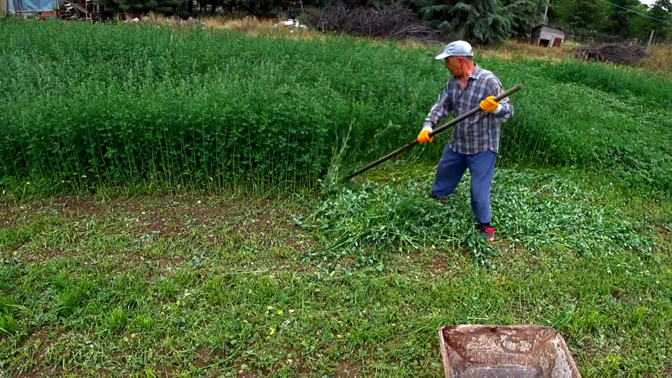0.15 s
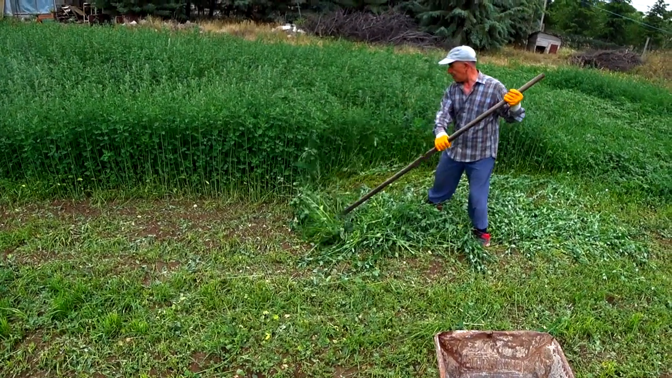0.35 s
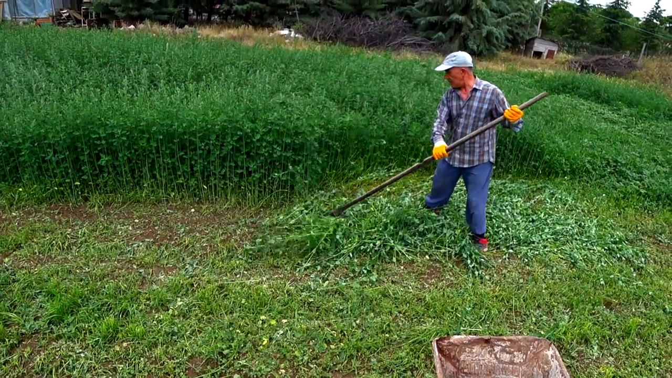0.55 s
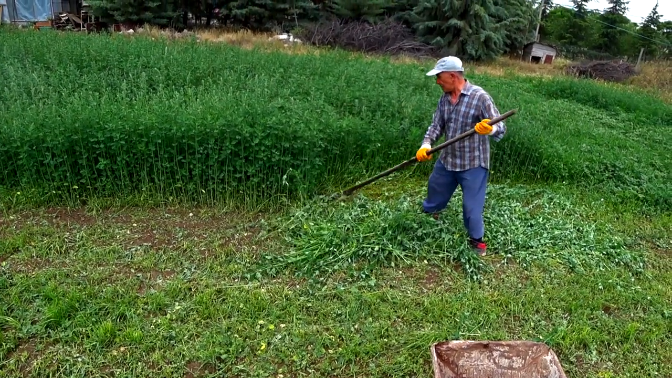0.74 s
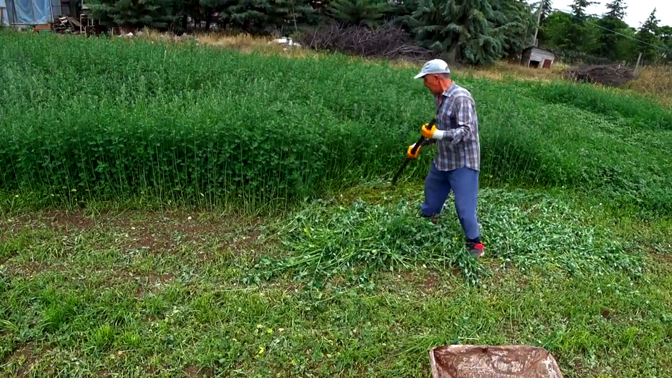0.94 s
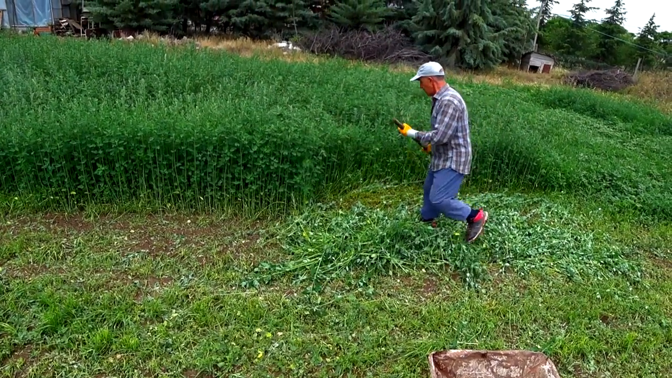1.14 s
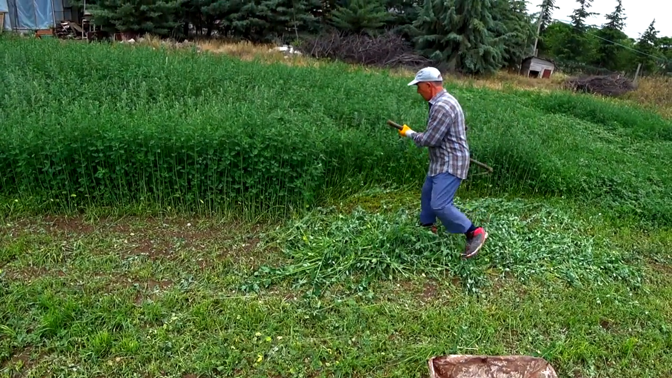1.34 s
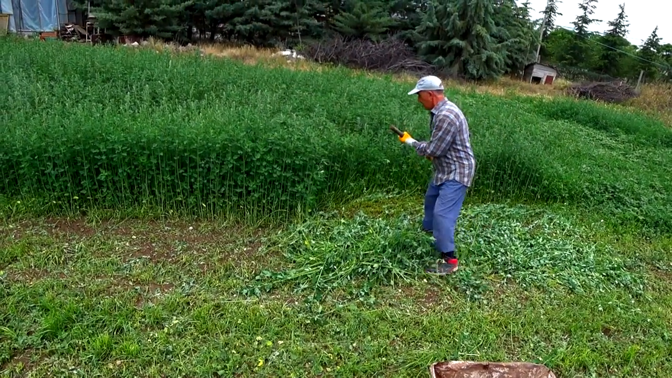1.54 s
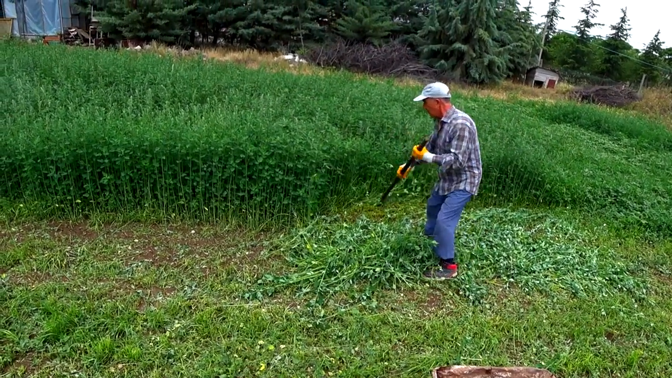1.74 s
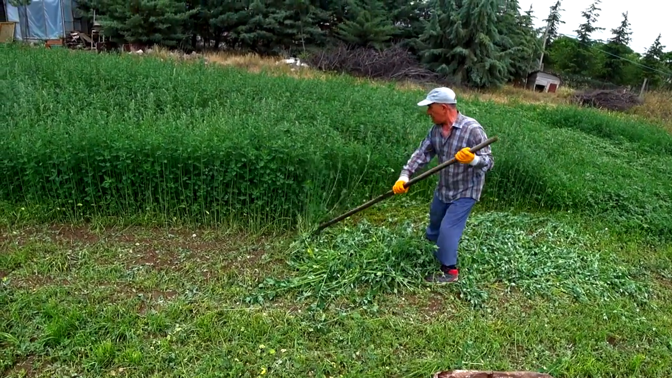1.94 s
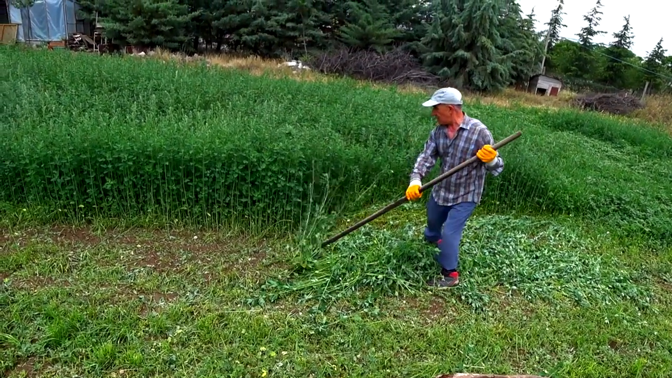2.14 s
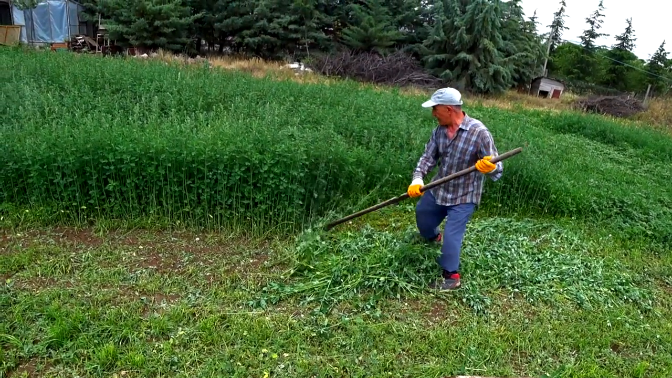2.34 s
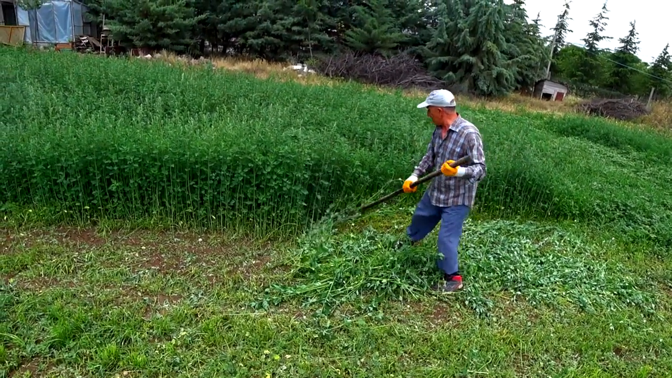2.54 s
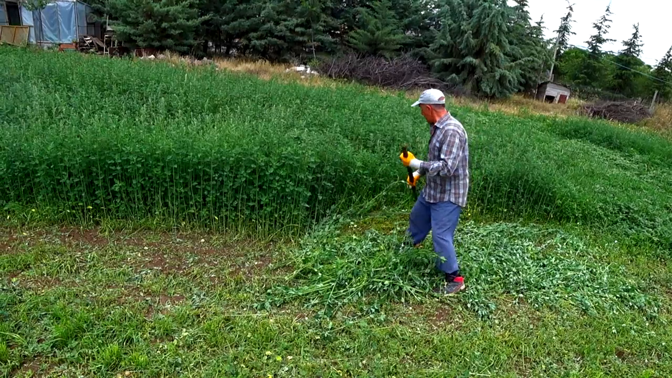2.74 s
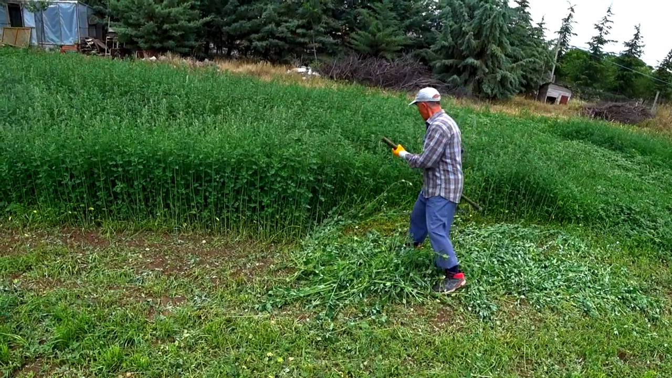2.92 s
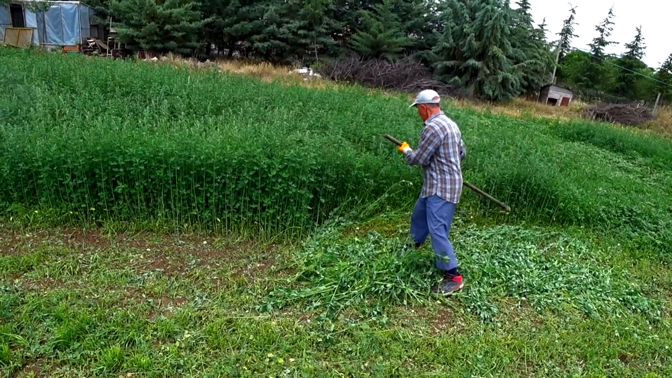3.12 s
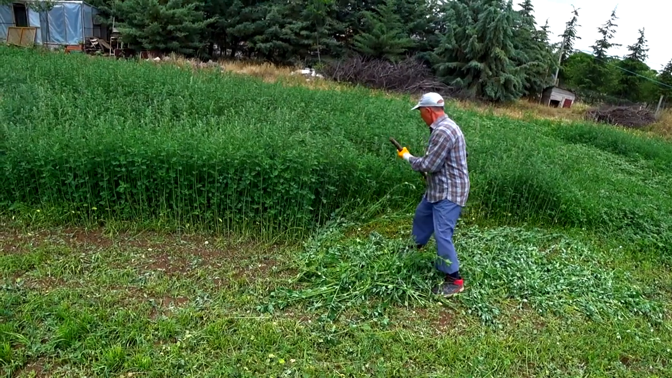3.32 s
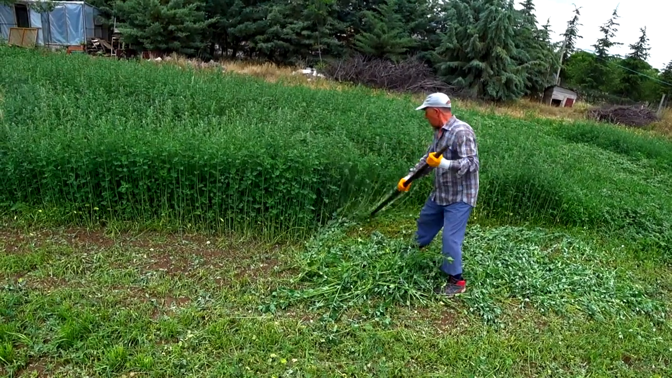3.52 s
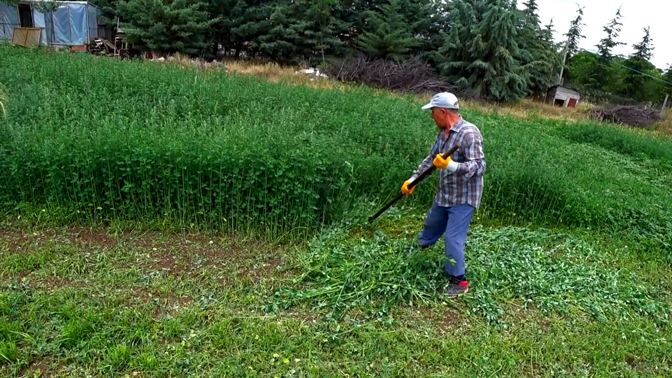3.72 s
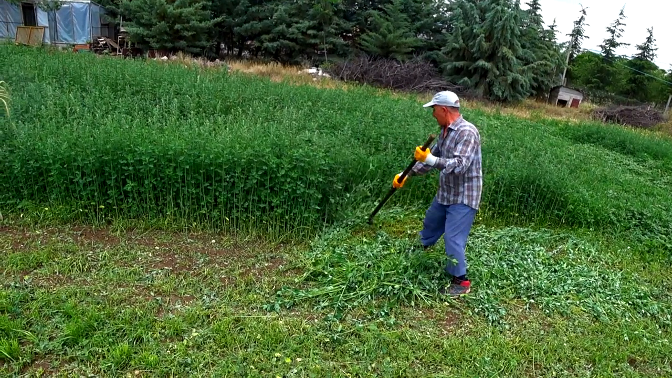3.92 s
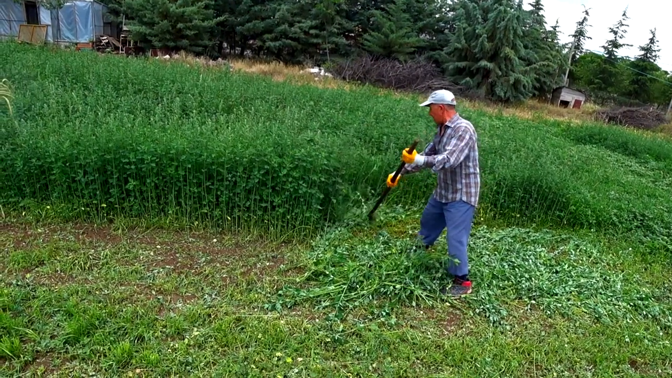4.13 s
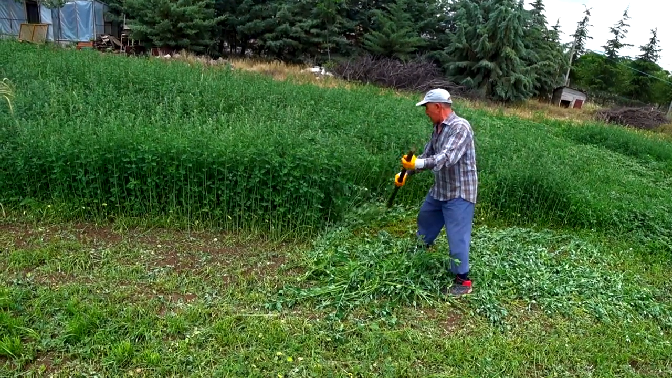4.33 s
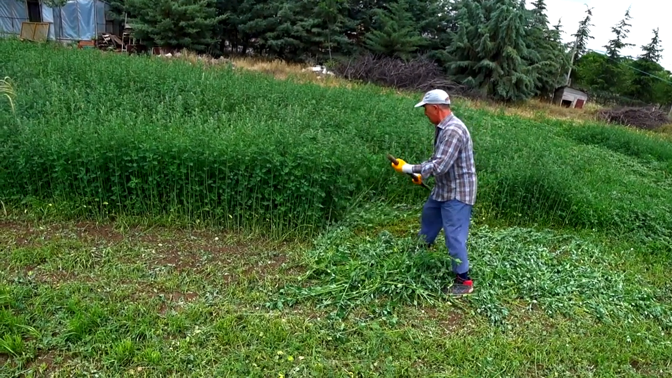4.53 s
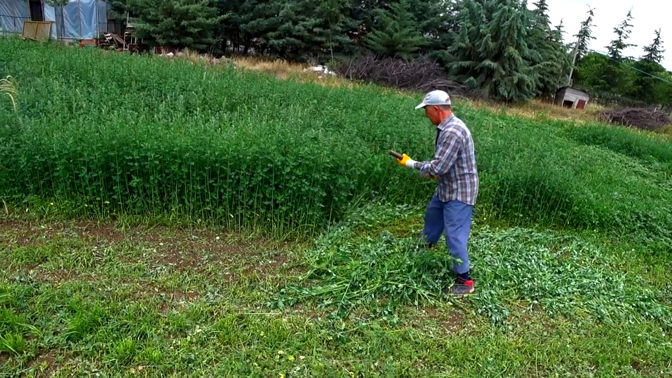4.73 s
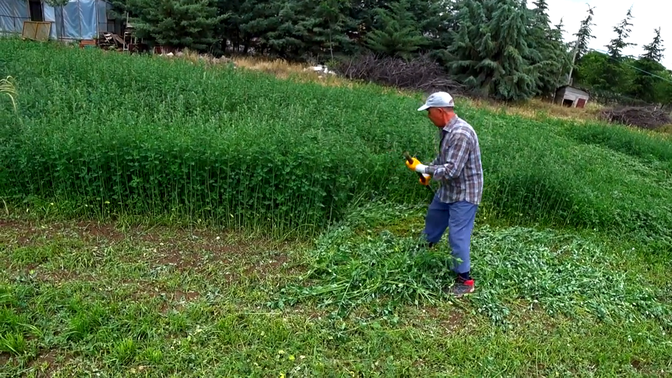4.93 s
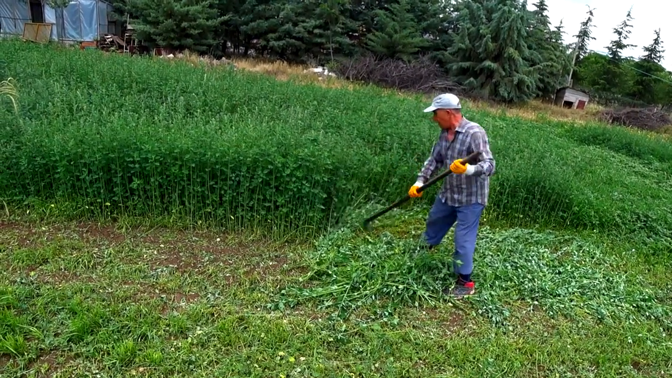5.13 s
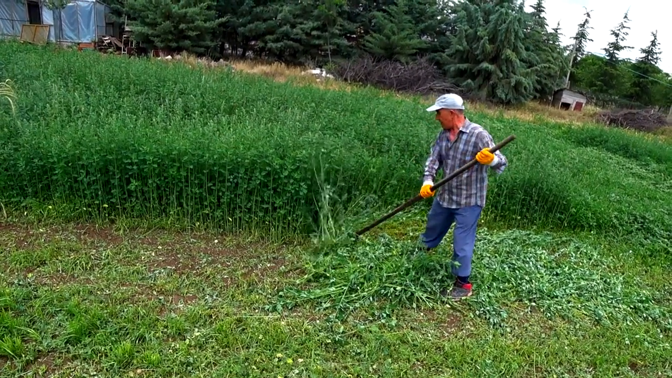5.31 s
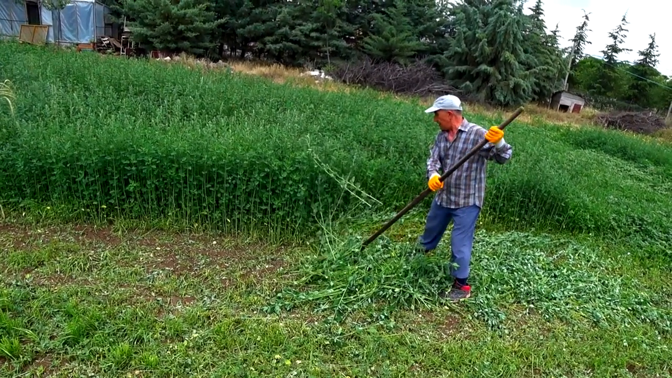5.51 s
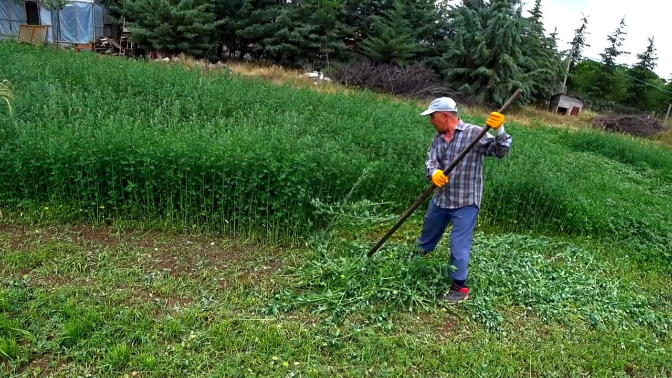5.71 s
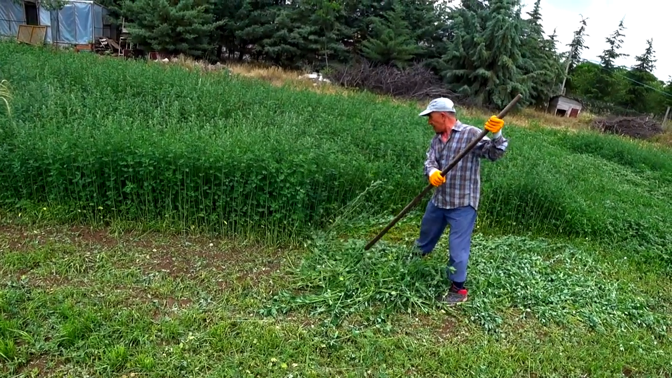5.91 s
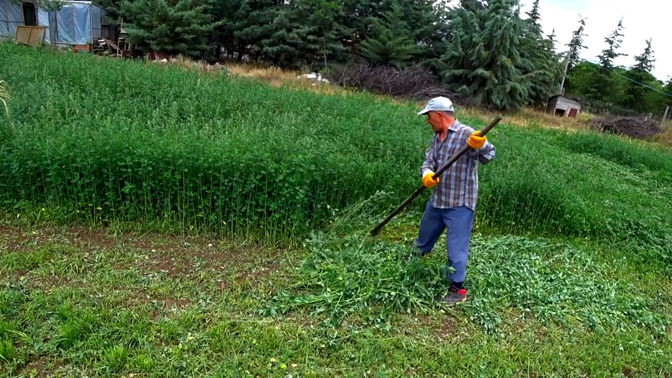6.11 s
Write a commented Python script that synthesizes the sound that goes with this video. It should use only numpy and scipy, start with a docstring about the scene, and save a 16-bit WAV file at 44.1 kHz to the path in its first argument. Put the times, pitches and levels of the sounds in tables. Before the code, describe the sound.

A hand scythe slices tall fresh grass in four separate crisp strokes, dragging softly over stubble between them, with faint far birds and low wind.

```python
"""In an open field a scythe mows tall fresh grass in four strokes, and is dragged back over stubble between them.
Dense random impulses, spectrally shaped, are the severed stems; they also excite the damped modes of the blade,
with plucked tones of scattered pitch that rise clearly only in the second stroke. Stalks snap; the swath rustles.
Gliding and warbling sines are small far birds; shaped noise is the low rumble and puffs of wind at the
microphone; there is one dull thud of decaying low modes."""
import sys
import numpy as np
from scipy import signal
from scipy.fft import rfft, irfft, next_fast_len
from scipy.io import wavfile
from scipy.ndimage import map_coordinates

SR = 44100
rng = np.random.default_rng(int(sys.argv[2]) if len(sys.argv) > 2 else 0)


def file_out(sig):
    """Save sig as 16-bit WAV at sys.argv[1]."""
    # one column per channel
    cols = np.atleast_2d(sig).T
    # limit, then scale
    lim = np.clip(cols, -1, 1)
    pcm = np.round(lim * 32767).astype(np.int16)
    wavfile.write(sys.argv[1], SR, pcm)


N = 271741
T = np.arange(N) / SR  # time in seconds


def amp(db):
    """Level law: decibels to amplitude gain."""
    return 10 ** (np.asarray(db) / 20)


def unit(x):
    """Normalisation: scale to rms 1."""
    return x / np.sqrt(np.mean(x ** 2) + 1e-20)


def along(points, hz):
    """Interpolation of (hz, value) points on a logarithmic frequency axis."""
    f, v = np.transpose(points)
    return np.interp(np.log(hz + 1), np.log(f + 1), v)


def wobble(rate):
    """Slow random modulation: a smooth curve through random knots, rate of them a second."""
    knots = rng.standard_normal(int(N * rate / SR) + 4)
    return map_coordinates(knots, [T * rate])


def filtered(x, response):
    """Linear filtering: the spectrum of x times a complex response of frequency."""
    size = next_fast_len(N + SR // 2)
    hz = np.fft.rfftfreq(size, 1 / SR)
    return irfft(rfft(x, size) * response(hz), size)[..., :N]


def coloured(x, spectrum):
    """Spectral shaping: x weighted by (hz, db) points, at rms 1."""
    return unit(filtered(x, lambda hz: amp(along(spectrum, hz))))


def rung(x, modes):
    """Modal resonance: x through a sum of damped resonators of alternating sign, at rms 1."""
    def response(hz):
        total = 0
        for k, (centre, width, db) in enumerate(modes):
            damping = 1j * hz * width
            total = total + (-1) ** k * amp(db) * damping / (centre * centre - hz * hz + damping)
        return total
    return unit(filtered(x, response))


def crackle(rate, spread_db, clump_db):
    """Shot noise: tiny fractures at random moments, rate a second, of random size and in clumps, at rms 1."""
    hits = rng.random(N) < rate / SR
    clumps = wobble(260) + wobble(55)
    size_db = spread_db * rng.standard_normal(N) + clump_db * clumps
    return unit(hits * rng.standard_normal(N) * amp(size_db))


def swells(rows):
    """Amplitude envelope: Gaussian bells from (centre_s, length_s, level_db) rows, the length being one sigma."""
    return sum(amp(db) * np.exp(-.5 * ((T - s) / length) ** 2) for s, length, db in rows)


def gesture(s, hold, rise_s, fade_s):
    """Exponential envelope: it rises, holds from s on, and fades; rise and fade are seconds per 20 dB."""
    before = np.maximum(s - T, 0) / max(rise_s, .005)
    after = np.maximum(T - s - hold, 0) / max(fade_s, .005)
    return amp(-20 * (before + after))


# cutting strokes: full_swing_s, hold_s, run_in_s (per 20 dB),
# pitch_rise_from_s (a time after the stroke's end means no rise),
# then relative levels: tearing_db, plucked_ring_db, broad_ring_db
STROKES = [(0.005, 0.13, 0.03, 0.13, -39.5, -50.5, -56), (1.878, 0.14, 0.19, 1.94, -37, -43.5, -51),
           (3.503, 0.0955, 0.07, 3.9, -39.5, -50, -52.5), (5.195, 0.036, 0.15, 6, -37, -45.5, -51)]
RUN_OUT_S = 0.21  # per 20 dB of fade at steepness 1, once the blade leaves the stand
RING_STEEPNESS = 1.72  # the ring comes and goes more steeply than the tearing


def swings(levels_db, steepness, grows_db):
    """Loading of the edge: gain over all strokes, one level each, changing by grows_db during the stroke."""
    gain = np.zeros(N)
    for (s, length, run_in, *_), db in zip(STROKES, levels_db):
        progress = np.clip((T - s) / length, 0, 1)
        envelope = gesture(s, length, run_in, RUN_OUT_S) ** steepness
        gain += envelope * amp(db + grows_db * (progress - .5))
    return gain


def pluck(s, hz, db, t60):
    """Damped free vibration: one short ring of the blade, soon stopped by the grass; t60 in seconds."""
    out = np.zeros(N)
    start = int(np.clip(round(s * SR), 0, N - 1))
    t = T[:min(SR // 20, N - start)]
    envelope = amp(db - 60 * t / t60) * (1 - np.exp(-t / 0.00033))
    out[start:start + len(t)] = envelope * np.sin(2 * np.pi * hz * t)
    return out


# outdoor rumble, spectrum: frequency_hz, relative_density_db
RUMBLE_SPECTRUM = [(13, -42), (22, -0.5), (59, 2), (109, -12.5), (143, -10), (248, -7.5), (400, -19),
                   (1190, -24.5), (2180, -29), (5110, -31), (6030, -35), (9110, -36), (11000, -32.5),
                   (15800, -36.5)]
# stereo spread of the rumble: frequency_hz, side_minus_mid_db
RUMBLE_WIDTH = [(60, -43), (110, -6), (200, -16.5), (380, 0), (700, 3.5), (1290, 5), (2380, 3.5),
                (8000, -3)]
# far hum: frequency_hz, mean_level_db
HUM = [(49.5, -61), (100, -60.5)]
# puffs of wind on the microphone: centre_s, length_s, level_db
PUFFS = [(0.36, 0.021, -41.5), (0.53, 0.016, -47.5), (0.666, 0.031, -38.5), (1.112, 0.015, -33.5)]
# a puff, spectrum: frequency_hz, relative_density_db
PUFF_SPECTRUM = [(15, -19), (42, 3), (70, -13), (130, -16), (300, -35), (1000, -100)]


def air(floor_db=-52.0):
    """Broadband turbulence: a low diffuse rumble with a faint hum, and puffs of wind on the microphone."""
    def mid_and_side(hz):
        mid_db = along(RUMBLE_SPECTRUM, hz)
        return amp([mid_db, mid_db + along(RUMBLE_WIDTH, hz)])
    mid, side = filtered(rng.standard_normal((2, N)), mid_and_side)
    rumble = amp(floor_db + 1.17 * wobble(6.4)) * unit(np.array([mid + side, mid - side]))
    hum = np.zeros(N)
    for hz, db in HUM:
        hum += amp(db + 5.0 * wobble(3.6)) * np.sin(2 * np.pi * hz * T + 2.0 * wobble(5.0))
    eddies = rng.standard_normal(N) + 0.51 * rng.standard_normal((2, N))  # partly different in each channel
    return rumble + hum + swells(PUFFS) * coloured(eddies, PUFF_SPECTRUM)


# tearing stems, spectrum: frequency_hz, relative_density_db
STEM_SPECTRUM = [(1470, -33), (2500, -4), (2740, -14), (3560, -4), (5890, 0.5), (6410, 0.5), (7530, 6),
                 (9140, 0.5), (10300, 5), (15800, -6.5)]
# brushing leaves, spectrum: frequency_hz, relative_density_db
LEAF_SPECTRUM = [(150, -54), (300, -2.5), (550, -8), (900, -4), (1400, -6.5), (2500, -1.5), (3600, -2.5),
                 (5500, 1), (6500, -2), (7500, 2.5), (8800, -2.5), (10500, 1.5), (12500, -5), (15800, -10)]
# upper blade modes, damped by the grass: frequency_hz, width_hz, relative_level_db
HIGH_MODES = [(1470, 1020, 0.5), (1704, 200, 7), (2420, 280, 3), (3300, 210, 2), (3880, 120, 3.5)]


def grass(loose, rest_db=-71, tear_grows_db=-0.5):
    """Friction and fracture: leaves brush softly and never quite rest; at full swing crisp tearing takes over."""
    *_, tear_db, _, _ = np.transpose(STROKES)
    stir = np.sqrt(swings(tear_db, 1, tear_grows_db) ** 2 + loose ** 2 + amp(rest_db) ** 2)
    level_db = 20 * np.log10(stir)
    cutting = 1 / (1.5 + np.exp((-49.0 - level_db) / 3))
    brush = coloured(crackle(rate=7000, spread_db=-0.5, clump_db=1.1), LEAF_SPECTRUM)
    tear = coloured(crackle(rate=10000, spread_db=0.9, clump_db=1.14), STEM_SPECTRUM)
    stubble = rung(crackle(rate=110, spread_db=1.5, clump_db=1), HIGH_MODES)  # stray stalks tick on the blade
    soft = amp(3.0) * brush + amp(-18.0) * stubble
    return stir * (np.sqrt(1 - cutting) * soft + amp(2.0) * np.sqrt(cutting) * tear)


# lower blade modes, damped by the grass: frequency_hz, width_hz, relative_level_db
LOW_MODES = [(404, 130, -2), (685, 170, -2.5), (980, 108, 0.5), (1390, 230, -4.5)]
RING_GROWS_DB = 2.5  # from start to end of a stroke


def blade(scrape, low_db=2.5, scrape_low_db=-2):
    """Forced modal vibration: fine stems drum on the blade; stubble rubs it with a denser, smoother grain."""
    *_, broad_db = np.transpose(STROKES)
    broad = swings(broad_db, RING_STEEPNESS, RING_GROWS_DB)
    low = amp(low_db) * broad * rung(crackle(rate=810, spread_db=1.5, clump_db=2.0), LOW_MODES)
    high = broad * rung(crackle(rate=450, spread_db=-1.7, clump_db=0.5), HIGH_MODES)
    rub = crackle(rate=2200, spread_db=0.5, clump_db=1.0)
    rubbing = scrape * (amp(scrape_low_db) * rung(rub, LOW_MODES) + rung(rub, HIGH_MODES))
    # the ring is hollow around 550 Hz
    hollow = [(440, 0.5), (550, -21), (660, -0.5)]
    return filtered(low + high + rubbing, lambda hz: amp(along(hollow, hz)))


# a snapping or ticking stalk, spectrum: frequency_hz, relative_density_db
CRACK_SPECTRUM = [(300, -3), (1500, -17), (3500, -8.5), (6000, 2), (7600, 7.5), (9000, 2.5), (10500, 6.5),
                  (15800, -2.5)]
# centre of the plucked pitch before any rise, speed of a rise in octaves per second, its limit in octaves
PLUCK_HZ, RISE_OCT_PER_S, RISE_LIMIT_OCT = 896, 19, 1.35


def stalks(rate=115, uneven=0.27, size_db=3, detune_oct=0.16, t60=0.019,
           overtone=2.36, overtone_db=-5, tick_db=-4, tick_s=0.0011):
    """Successive plucking: stouter stems tick and ring the blade at scattered pitches, rising clearly in stroke two."""
    rings, ticks = np.zeros((2, N))
    t = T[:SR // 100]
    stems_per_stroke = 60
    for s, length, run_in, rise_from, *_ in STROKES:
        draws = rng.standard_normal((stems_per_stroke, 4))
        for k, (late, size, detune, upper) in enumerate(draws):
            at = s - run_in + (k + uneven * late) / rate
            if at < 0:
                continue
            # zero throughout if rise_from lies after the stroke's end
            rise = np.clip((min(at, s + length) - rise_from) * RISE_OCT_PER_S, 0, RISE_LIMIT_OCT)
            hz = PLUCK_HZ * 2 ** (rise + detune_oct * (1 + rise) * detune)  # a risen pitch scatters more
            rings += pluck(at, hz, size_db * size, t60)
            rings += pluck(at, hz * overtone, overtone_db + size_db * upper, t60 / 2)
            tick = amp(size_db * size) * np.exp(-t / tick_s) * rng.standard_normal(len(t))
            ticks[round(at * SR):][:len(t)] += tick
    *_, tear_db, pluck_db, _ = np.transpose(STROKES)
    ringing = swings(pluck_db + 12, RING_STEEPNESS, 2.4) * rings
    ticking = swings(tear_db + tick_db - 14, RING_STEEPNESS, 0) * coloured(ticks, CRACK_SPECTRUM)
    return ringing + ticking


# tough stems crunching in the upper middle range: frequency_hz, width_hz, relative_level_db
CRUNCH_MODES = [(1700, 610, -8.5), (2370, 280, 1)]


def crunch():
    """Resonant fracture: bunched stems give way in a coarse, woody crackle that builds through the stroke."""
    *_, broad_db = np.transpose(STROKES)
    fractures = crackle(rate=260, spread_db=2.0, clump_db=-1)
    return swings(broad_db, RING_STEEPNESS, RING_GROWS_DB) * rung(fractures, CRUNCH_MODES)


# the swath slumping a moment after a stroke: centre_s, length_s, level_db
SLUMPS = [(0.39, 0.071, -60), (2.275, 0.036, -48.5), (5.5, 0.088, -61.5)]
# pushed bulk of grass, spectrum: frequency_hz, relative_density_db
PUSH_SPECTRUM = [(50, -10), (110, 3.5), (180, 3), (300, -5), (430, -9), (550, -24), (1200, -55)]


def swath(shove_db=-2.5):
    """Granular flow: the heavy bundle of cut grass rumbles softly as it is pushed aside and sinks."""
    *_, broad_db = np.transpose(STROKES)
    shove = amp(shove_db) * swings(broad_db, steepness=1.35, grows_db=1.5)
    grains = crackle(rate=1200, spread_db=-2.0, clump_db=1.5)
    return (shove + swells(SLUMPS)) * coloured(grains, PUSH_SPECTRUM)


# thick stalks snapping or knocking on the blade:
# start_s, relative_crack_db, relative_ring_db, ring_hz, crack_decay_s (to 1/e)
SNAPS = [(0.102, -47, -38, 795, 0.0021), (0.121, -30.5, -43.5, 2250, 0.0018),
         (0.137, -34, -40, 1300, 0.0014), (0.293, -35.5, -62, 2400, .0006),
         (0.735, -48, -39.5, 3080, 0.0006), (0.751, -51, -37, 2500, 0.00087),
         (1.464, -53, -32, 2230, 0.00017), (1.591, -52, -40.5, 1940, 0.00059),
         (1.779, -37, -48.5, 3360, 0.0014), (1.809, -51, -45.5, 2310, 0.0012),
         (1.889, -46, -43, 900, 0.0018), (1.943, -45, -41, 1010, 0.0015), (1.972, -36, -39, 1990, 0.00086),
         (2.002, -28, -28, 2420, .0007), (2.028, -51, -36.5, 1750, 0.0018),
         (2.0929, -29.5, -44, 2400, 0.00073), (3.485, -34, -46, 890, .002), (3.514, -37, -40, 1350, 0.0015),
         (3.608, -30, -41, 1015, 0.002), (4.465, -53, -41, 2310, 0.00051), (5.215, -33, -34, 950, 0.00069),
         (5.2493, -26.5, -35, 1410, 0.0012), (5.259, -31, -31.5, 1560, 0.0013),
         (5.279, -34, -50, 1500, .0004), (5.3235, -29, -48, 2500, .0005),
         (5.3255, -34.5, -30.5, 2440, 0.0008), (5.3384, -25, -40.5, 3370, 0.00093),
         (5.362, -36.5, -43.5, 3270, 0.00098), (5.969, -39, -47, 2410, 0.00068),
         (6.101, -64, -47.5, 1930, 0.0018)]


def snaps(splinter_times=11, ring_times=16, splinter_db=-8.0, break_db=9, knock_db=-1):
    """Impulsive excitation: a stalk cracks sharply, splinters briefly and knocks the blade into ringing."""
    cracks, knocks, rings = np.zeros((3, N))
    t = T[:SR // 20]
    for s, crack_db, ring_db, hz, crack_s in SNAPS:
        start = round(s * SR)
        splintering = amp(splinter_db) * np.exp(-t / (splinter_times * crack_s))
        shape = np.exp(-t / crack_s) + splintering
        fibres, contact = shape * rng.standard_normal((2, len(t)))
        fibres[0] = amp(break_db)  # the break itself is one impulse
        cracks[start:start + len(t)] += amp(crack_db - 9.5) * unit(fibres)[:N - start]
        knocks[start:start + len(t)] += amp(ring_db + knock_db) * contact[:N - start]
        rings += pluck(s, hz, ring_db + 5.5, ring_times * crack_s)
    body = rung(knocks, HIGH_MODES) + amp(-6.0) * rung(knocks, LOW_MODES)
    body += amp(-10.5) * coloured(knocks, PUSH_SPECTRUM)
    return cracks.std() * coloured(cracks, CRACK_SPECTRUM) + knocks.std() * body + rings


# blade brushing loose grass, on the follow-through or drawn back: start_s, hold_s,
# rise_s and fade_s (per 20 dB), relative_brushing_db, relative_scrape_db
SWEEPS = [(0.217, 0.12, 0.17, 0.3, -41, -59), (0.725, 0.013, 0.15, 0.26, -51.5, -65),
          (1.065, 0.068, 0.15, 0.23, -55.5, -102), (1.492, 0.16, 0.16, 0.061, -54.5, -63),
          (1.696, 0.049, 0.03, 0.046, -53, -64), (2.19, 0.43, 0.68, 0.62, -57, -63.5),
          (2.557, 0.06, 0.065, 0.078, -72, -60.5), (3.771, 0.17, 0.11, 0.48, -62.5, -58),
          (4.137, 0.072, 0.28, 0.15, -61.5, -85), (4.351, 0.021, 0.022, 0.15, -55, -60.5),
          (4.488, 0.09, 0.22, 0.13, -57.5, -88), (5.366, 0.38, 0.14, 0.24, -52, -88),
          (5.938, 0.16, 0.046, 0.31, -52, -70.5)]


def brushing():
    """Sliding contact: gains for brushed loose grass and for stubble scraping the blade, both in uneven tufts."""
    power = np.zeros((2, N))
    for s, hold, rise, fade, brush_db, scrape_db in SWEEPS:
        power += (amp([[brush_db], [scrape_db]]) * gesture(s, hold, rise, fade)) ** 2
    tufts = amp([0.9 * wobble(24), 2.5 * wobble(35)])
    return np.sqrt(power) * tufts


# ring of the thud: frequency_hz, relative_level_db
BOOM_MODES = [(73, -8), (121, 1.5), (162, -5), (249, -10.5), (300, -15), (360, -11.5)]
# noise of the thud, spectrum: frequency_hz, relative_density_db
THUD_SPECTRUM = [(30, 4), (75, -6), (140, 6.5), (250, 2), (350, -10.5), (520, -19), (880, -10.5),
                 (1300, -20.5), (2600, -20), (5000, -35), (9000, -58)]


def thud(start=.756, t60=0.62, ring_db=-33.5, noise_db=-34):
    """Exponential decay: low modes and shaped noise make one dull, booming thud that dies away."""
    t = np.maximum(T - start, 0)
    ring = sum(amp(db) * np.sin(2 * np.pi * hz * t + 0.32 * wobble(40.6)) for hz, db in BOOM_MODES)
    noise = coloured(rng.standard_normal(N), THUD_SPECTRUM)
    boom = amp(ring_db) * unit(ring) + amp(noise_db) * noise
    return amp(-60 * t / t60) * (1 - np.exp(-t / 0.0051)) * boom


# far birds, runs of quick falling chirps: start_s, nominal_start_hz, relative_level_db, notes (count)
CHIRPS = [(0.909, 6150, -61.5, 3), (2.703, 5680, -67, 3), (4.068, 5640, -66.5, 4), (4.698, 4750, -67.5, 3),
          (4.73, 5440, -72, 3), (4.78, 3670, -70, 2), (4.895, 5420, -69.5, 3), (5.074, 3450, -58.5, 1),
          (5.686, 6300, -65, 4), (5.815, 4980, -68.5, 2)]
# far birds, slowly sinking whistles: start_s, length_s, start_hz, relative_level_db
WHISTLES = [(4.049, 0.11, 3060, -70.5), (4.59, 0.13, 3180, -70), (4.96, 0.07, 1840, -76),
            (4.885, 0.036, 3170, -68.5)]
# nominal note length, note to note, share of the pitch lost
CHIRP_S, CHIRP_SPACING_S, CHIRP_FALL = 0.0072, 0.022, 0.12
WHISTLE_FALL = 0.1  # share of the pitch lost


def chirps_and_whistles():
    """Frequency modulation: each note is a sine gliding downward, no two quite alike."""
    song = np.zeros(N)
    quaver, fading = 1 + 0.011 * wobble(90), amp(3.5 * wobble(70))
    notes = [(*row, WHISTLE_FALL) for row in WHISTLES]
    for s, hz, db, count in CHIRPS:
        for k in range(round(count)):
            at = s + (k + rng.normal(0, 0.1)) * CHIRP_SPACING_S
            length = CHIRP_S * rng.uniform(0.7, 1.37)
            fall = CHIRP_FALL * rng.uniform(0.28, 1.43)
            notes.append((at, length, hz * rng.normal(1, 0.016), db, fall))
    for s, length, start_hz, db, fall in notes:
        u = np.linspace(0, 1, int(length * SR))
        note = round(s * SR) + np.arange(len(u))
        hz = start_hz * (1 - fall + fall * (1 - u) ** 1.66) * quaver[note]
        tone = np.sin(2 * np.pi * np.cumsum(hz) / SR)
        song[note] += amp(db + 9.0) * fading[note] * np.sqrt(4 * u * (1 - u)) * tone
    return song


# far birds, a sharp high buzz with a softer, sinking trill after it: start_s, trill_length_s, relative_level_db
BUZZES = [(2.574, 0.13, -51), (2.952, 0.19, -51.5), (3.751, 0.37, -51), (4.147, 0.18, -51.5)]


def twitters(buzz_hz=5500, trill_hz=4600, buzz_s=0.0353, warble=0.042, trill_fall=0.2):
    """Random frequency modulation: fast pitch wobble makes a buzz, then a trill that sinks and fades."""
    def progress(s, length):
        return np.clip((T - s) / length, 0, 1)
    song = np.zeros(N)
    buzz = np.sin(2 * np.pi * buzz_hz * np.cumsum(1 + warble * wobble(640)) / SR)
    flutter = 1 + 0.13 * wobble(650)
    for s, length, db in BUZZES:
        song += amp(db - 0.5) * np.sin(np.pi * progress(s, buzz_s)) * buzz
        u = progress(s + buzz_s / 4, length)
        cycles = trill_hz * np.cumsum((1 - trill_fall * u) * flutter) / SR
        trill = amp(2.9 * wobble(87)) * np.sin(2 * np.pi * cycles)
        song += amp(db - 2.5) * np.sqrt(np.sqrt(u)) * (1 - u) * trill
    return song


def scatter(x, t60):
    """Diffuse reflection: ground and trees answer with a decaying noise tail, different at each ear."""
    t = T[:SR // 2]
    tail = rng.standard_normal((2, len(t))) * amp(-60 * t / t60) * (1 - np.exp(-t / 0.00082))
    return signal.fftconvolve(x[None], tail / np.linalg.norm(tail[0]), axes=1)[:, :N]


def birds():
    """Propagation through foliage: the song arrives directly and blurred by the trees."""
    song = chirps_and_whistles() + twitters()
    return amp(2.5) * song + scatter(song, t60=0.4)


def scene():
    """Superposition: the mower is slightly to the left; the ground scatters mostly the middle range."""
    loose, scrape = brushing()
    scythe = grass(loose) + blade(scrape) + stalks() + crunch() + swath() + snaps() + thud()
    ground = [(100, -53), (300, -30.0), (1000, -11), (2500, -16.0), (6000, -53)]
    spread = filtered(scatter(scythe, t60=0.073), lambda hz: amp(along(ground, hz)))

    def panning(hz):
        left_db = along([(200, 0.14), (1000, 1.2), (5000, 0.23), (9000, 2.25)], hz)  # left minus right
        return amp([left_db / 2, -left_db / 2])
    return filtered(scythe, panning) + spread + birds() + air()


def record(dry, top_hz=15950):
    """Band limitation: nothing is kept from top_hz upward."""
    return filtered(dry, lambda hz: hz < top_hz)


dry = scene()
out = record(dry)
file_out(out)
```